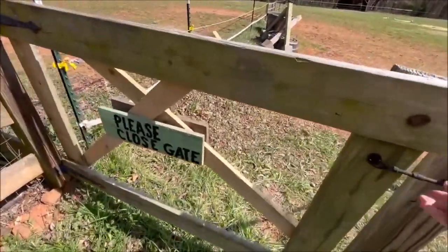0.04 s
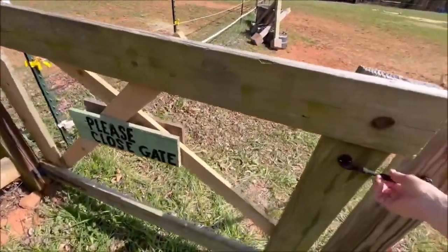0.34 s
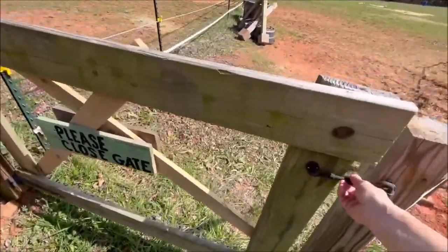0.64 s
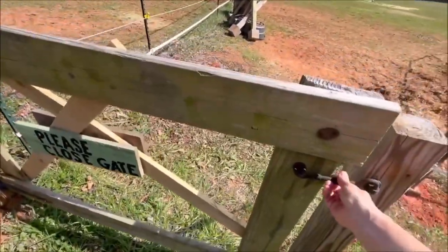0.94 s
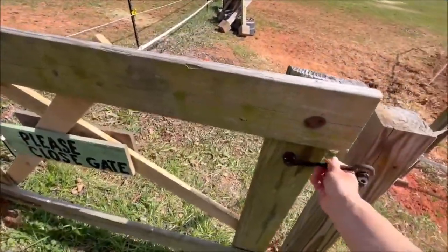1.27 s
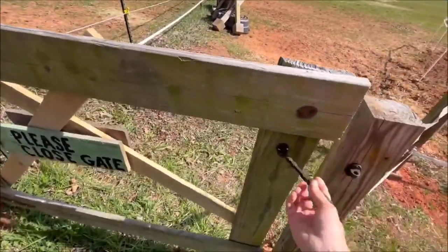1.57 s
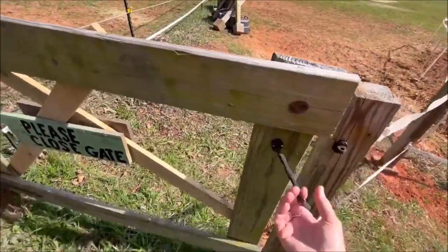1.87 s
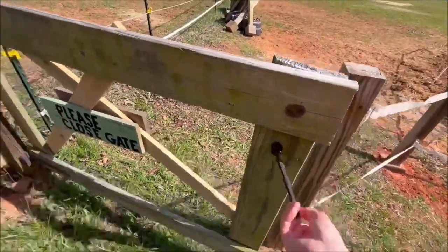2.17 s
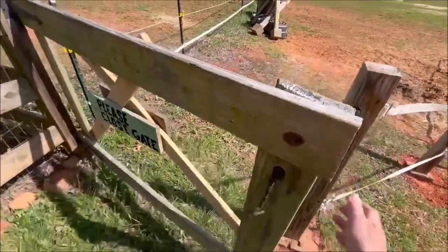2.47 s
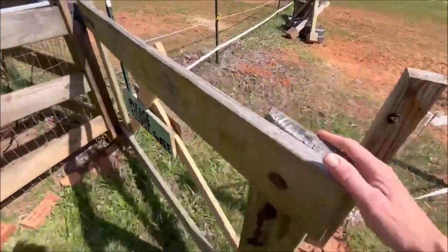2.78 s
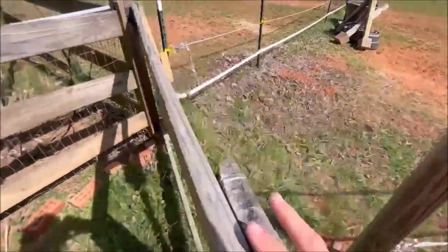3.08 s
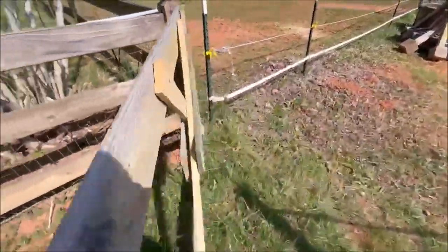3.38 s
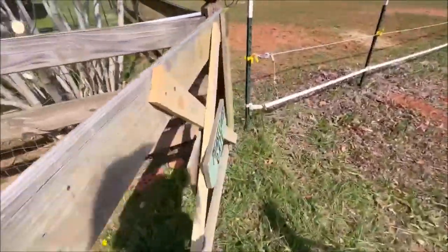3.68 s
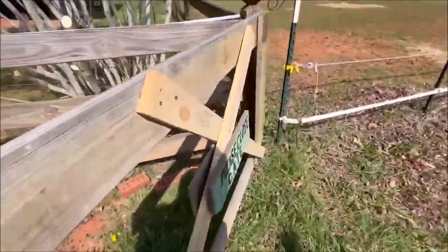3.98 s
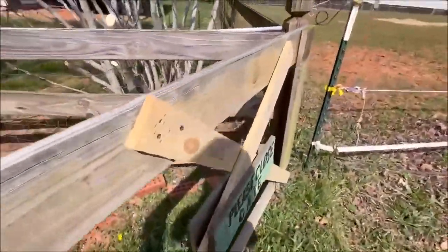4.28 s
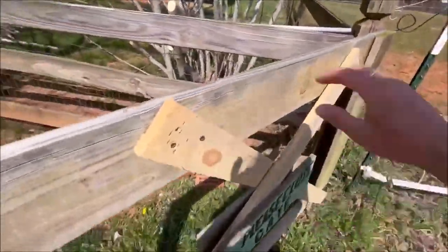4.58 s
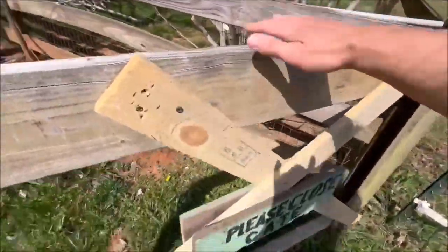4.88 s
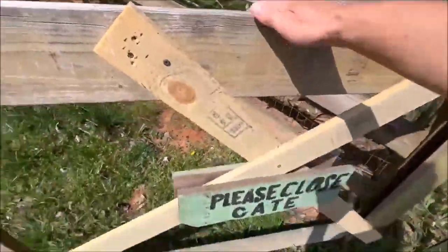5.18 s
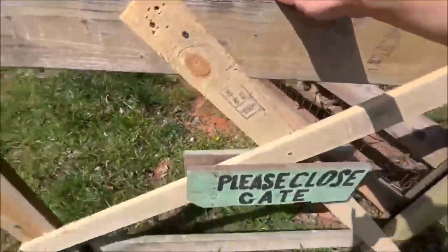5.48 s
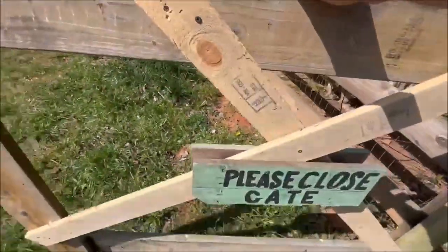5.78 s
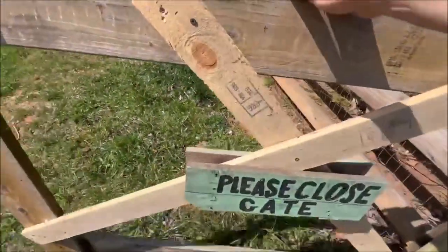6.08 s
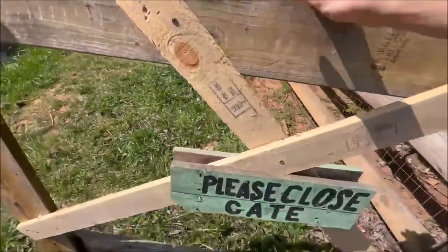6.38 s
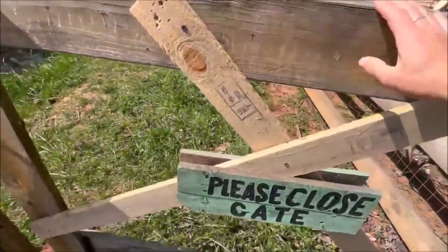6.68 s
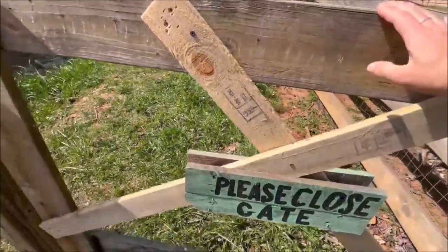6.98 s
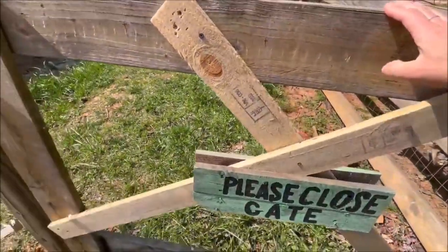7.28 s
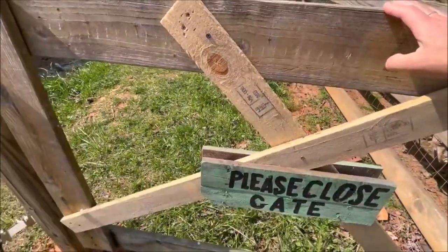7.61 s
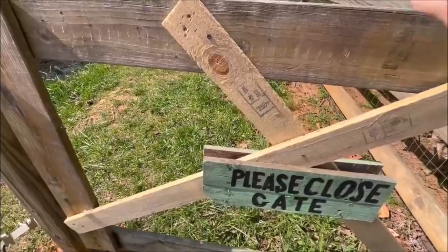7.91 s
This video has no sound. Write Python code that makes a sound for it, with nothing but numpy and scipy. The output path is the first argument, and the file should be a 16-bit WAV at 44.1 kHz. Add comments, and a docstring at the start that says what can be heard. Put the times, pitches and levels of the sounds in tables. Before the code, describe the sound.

A metal hook latch clicks, then clatters and rings against a wooden gate, followed by soft footsteps in grass and light bumps.

```python
"""Open air rumbles, a sleeve swishes and gusts buffet the two ports of a hand-held microphone.
A steel hook is worked out of its eye on a wooden farm gate, then dropped: it knocks, chatters and rings.
Each impact excites the damped modes of the boards; some also set the hook ringing. Steps rustle through
the grass by friction as the gate swings open and bumps softly against the fence, which resonates."""
import sys
import numpy as np
from scipy import signal
from scipy.fft import rfft, irfft, next_fast_len
from scipy.io import wavfile
from scipy.ndimage import uniform_filter1d

SR = 44100
rng = np.random.default_rng(int(sys.argv[2]) if len(sys.argv) > 2 else 0)


def generate_wav(sig):
    """Save sig (samples, or channels by samples) to the path in sys.argv[1] as 16-bit PCM at SR."""
    pcm = np.round(np.clip(np.atleast_2d(sig).T, -1, 1) * 32767).astype(np.int16)
    wavfile.write(sys.argv[1], SR, pcm)


N = 355005
TIME = np.arange(N) / SR
UNLATCHED_S, HOOK_FREE_S, AT_FENCE_S = 2.0, 2.3, 4.0


def undb(db):
    """Amplitude ratio of a level in decibels."""
    return 10 ** (np.asarray(db) / 20)


def unit(x):
    """Normalisation to rms 1."""
    return x / np.sqrt(np.mean(x ** 2) + 1e-20)


def curve(rows):
    """Amplitude envelope from (t/s, level/dB) rows."""
    return undb(np.interp(TIME, *np.transpose(rows)))


def along(points, hz):
    """Interpolation of (f/Hz, value) points over log frequency."""
    f, value = np.transpose(points)
    return np.interp(np.log(hz + 1), np.log(f), value)


def sides(pan_db):
    """Constant-power panning: gains for a left-minus-right level."""
    gains = undb(np.array([[.5], [-.5]]) * pan_db)
    return gains / np.sqrt(np.mean(gains ** 2, axis=0))


def colour(x, points):
    """Zero-phase filtering by (f/Hz, gain/dB) points."""
    size = next_fast_len(x.shape[-1])
    gain = undb(along(points, np.fft.rfftfreq(size, 1 / SR)))
    return irfft(rfft(x, size) * gain, size)[..., :x.shape[-1]]


def causal(db):
    """Minimum-phase response with these gains: it rings only after its cause."""
    cepstrum = irfft(db * np.log(10) / 20)
    half = len(cepstrum) // 2
    cepstrum[1:half] *= 2
    cepstrum[half + 1:] = 0
    return np.exp(rfft(cepstrum))


def ports(x, split_hz):
    """Spatial coherence: two independent signals become alike in the bass, staying apart in the treble."""
    size = next_fast_len(x.shape[-1])
    coherence = .92 / (1 + (np.fft.rfftfreq(size, 1 / SR) / split_hz) ** 2)
    mid, side = rfft(x, size) * np.sqrt([1 + coherence, 1 - coherence])
    return irfft(np.array([mid + side, mid - side]), size)[:, :x.shape[-1]] / np.sqrt(2)


def wander(rate_hz):
    """Smooth random modulation of rms 1."""
    step = int(SR / rate_hz)
    held = np.repeat(rng.standard_normal(N // step + 1), step)
    return unit(uniform_filter1d(held, step)[:N])


def fade(t, t60):
    """Exponential decay by 60 dB in t60, which is at least 1 ms."""
    return np.exp(-np.log(1000) * t / max(t60, 1e-3))


def swells(rows, rest_db, rise_share=.45):
    """Incoherent addition: rounded (t/s, length/s, level/dB) peaks sum in power over a floor."""
    t = TIME[::64]
    power = np.full(len(t), undb(rest_db) ** 2)
    for s, length, db in rows:
        away = (t - s) / (length * np.where(t < s, rise_share, 1 - rise_share))
        power += undb(db) ** 2 * np.exp(2 * (1 - np.hypot(1, away)))
    return np.sqrt(np.interp(TIME, t, power))


def add(out, s, x):
    """Superposition of x onto out at time s."""
    i = int(s * SR)
    out[:, i:i + x.shape[1]] += x[:, :N - i]


# Ambient spectrum: f/Hz, gain/dB
AIR_SPECTRUM = [(15, -49), (25, -14), (55, -0.5), (114, 0.5), (265, -14.5), (410, -15.5), (758, -23.5),
                (907, -20), (1810, -26.5), (2340, -25.5), (2530, -27.5), (4340, -38), (6540, -41.5),
                (11500, -79.5), (15000, -80), (22000, -120)]
# Ambient envelope: t/s, level/dB
AIR_ENVELOPE = [(0, -55.5), (2.5, -55), (3.15, -57), (4.4, -55), (6.3, -53.5), (8.05, -54.5)]


def air():
    """Diffuse field: distant rumble and the faint hiss of open country."""
    noise = ports(rng.standard_normal((2, N)), split_hz=450)
    return unit(colour(noise, AIR_SPECTRUM)) * curve(AIR_ENVELOPE) * undb(2.7 * wander(10))


# Distant whistles: start/s, end/s, f/Hz, level/dB
WHISTLE_TONES = [(.1, .98, 2550, -74), (.37, .48, 2557, -63), (.1, .66, 6440, -72), (2.08, 2.24, 6400, -73),
                 (2.05, 2.27, 1776, -69), (7.2, 8.0, 1787, -71)]


def whistles(waver=0.0045):
    """Random frequency and amplitude modulation: faint, unsteady tones from across the field."""
    out, drift, flutter = np.zeros((2, N)), wander(60), wander(25)
    for start, end, hz, db in WHISTLE_TONES:
        span = slice(int(start * SR), int(end * SR))
        phase = 2 * np.pi * np.cumsum(hz * (1 + waver * drift[span])) / SR
        tone = np.sin(phase + np.array([[0], [1]]))
        envelope = signal.windows.tukey(len(phase), .5) * undb(2 * flutter[span])
        add(out, start, unit(tone * envelope) * undb(db))
    return out


# Gusts on the ports: t/s, length/s, relative level/dB
GUST_SWELLS = [(.47, 0.057, -43), (.62, 0.063, -36.5), (.78, 0.081, -47), (1.42, 0.1, -36),
               (1.6, 0.14, -34), (1.7, 0.068, -34), (1.79, 0.06, -28), (1.97, 0.24, -48), (2.48, 0.2, -50)]


def wind():
    """Turbulent pressure: eddies push on the two ports mostly in opposition."""
    spectrum = [(20, -32.5), (45, -3), (70, -4), (110, -5.5), (180, -19.5), (350, -26),
                (900, -62.5), (4000, -90.5)]  # f/Hz, gain/dB
    eddies = unit(colour(rng.standard_normal((3, N)), spectrum))
    pressure = eddies[2] * np.array([[1], [-1]]) + 0.5 * eddies[:2]
    return pressure * swells(GUST_SWELLS, rest_db=-65.5) * undb(-2 + 2.3 * wander(28))


# Low buffets on the microphone: t/s, peak level/dB, f/Hz
BUFFET_PULSES = [(0.627, -31.5, 85.5), (1.401, -40, 61.6), (1.609, -42, 55), (1.69, -46, 62),
                 (1.756, -34.5, 66), (1.801, -38, 50), (1.971, -42, 53.4), (7.849, -38.5, 68)]


def buffets():
    """Gaussian wave packets: a couple of slow pressure swings, in phase at both ports."""
    out, t = np.zeros((2, N)), np.arange(-2000, 2000) / SR
    for s, db, hz in BUFFET_PULSES:
        pulse = np.exp(-(t * hz) ** 2) * np.cos(2 * np.pi * hz * t)
        add(out, s + t[0], undb(db) * pulse[None])
    return out


# Friction hiss: f/Hz, gain/dB
HISS_SPECTRUM = [(1500, -10), (2600, -10.5), (3900, -11.5), (4800, -4.5), (5500, -5), (6000, -7),
                 (7700, -11), (9500, -2), (11500, -6)]
# Direction of the hiss: f/Hz, left minus right/dB
HISS_BALANCE = [(1500, -6.5), (3500, 14.5), (5400, 20.5), (7500, 6.5), (10000, -1.5)]
# Top octave of the hiss: t/s, gain/dB
HISS_TREBLE = [(0, -12), (1, -4), (2.3, -5), (3.5, -7), (4.5, -5), (6.5, 2), (8.05, -7)]
# Duller brushing: f/Hz, gain/dB
BRUSH_SPECTRUM = [(150, -9), (300, 4.5), (600, -2.5), (1250, 0.5), (2000, 0), (3200, -4), (5000, -30)]
# A sleeve at the latch, then steps in grass: t/s, length/s, relative hiss/dB, relative brushing/dB
SWISH_SWELLS = [(-0.003, 0.12, -54.5, -64), (0.581, 0.11, -60.5, -49.5), (0.875, 0.11, -55.5, -58),
                (1.84, 0.8, -64, -60), (2.346, 0.18, -56.5, -52), (2.718, .2, -64, -60),
                (3.524, 0.26, -54.5, -52), (4.008, 0.28, -53.5, -54), (4.32, 0.062, -58.5, -46),
                (4.641, 0.097, -43.5, -56), (4.877, 0.24, -51, -51.5), (5.276, 0.35, -55.5, -55),
                (5.625, 0.089, -40.5, -46), (5.735, 0.13, -57.5, -63.5), (5.961, 0.076, -43, -48),
                (6.094, 0.12, -51, -48), (6.446, 0.45, -51.5, -54.5), (6.877, 0.11, -54, -62),
                (7.122, 0.33, -60, -62.5), (7.369, 0.096, -59.5, -58), (7.797, 0.031, -59.5, -60),
                (8.02, 0.087, -68, -77)]


def hiss_envelope():
    """Power sum of the swishes' hiss, shared by rustle and stalks."""
    return swells([row[:3] for row in SWISH_SWELLS], rest_db=-68.5)


def rustle(grain_db=2.5, crunch_db=0.8, flicker_db=1.85, treble_hz=6400):
    """Sliding friction: countless blades and fibres slip, a grainy hiss over a duller brushing."""
    slips = rng.standard_normal((2, N)) * undb(grain_db * np.minimum(rng.exponential(size=N), 6))
    slips *= undb(crunch_db * np.clip(wander(120), 0, 2.5) ** 2)  # a tuft gives way all at once
    hiss = np.array([colour(colour(x, HISS_SPECTRUM), [(f, sign * db / 2) for f, db in HISS_BALANCE])
                     for x, sign in zip(slips, (1, -1))])
    hiss = unit(hiss) * hiss_envelope() * undb(2 + 0.5 * wander(120))
    treble = signal.sosfiltfilt(signal.butter(4, treble_hz, "highpass", fs=SR, output="sos"), hiss)
    hiss += treble * (curve(HISS_TREBLE) - 1)
    rub = ports(rng.standard_normal((2, N)), split_hz=467) * undb(1.9 * wander(110))
    brush_envelope = swells([(s, length, db) for s, length, _, db in SWISH_SWELLS], rest_db=-62.5)
    brush = unit(colour(rub, BRUSH_SPECTRUM)) * brush_envelope * sides(8) * undb(-4)
    return (hiss + brush) * undb(flicker_db * wander(35))


def stalks(count=260, steps_s=(3.4, 7.4), cluster_s=.005, low_hz=2070, high_hz=10900):
    """Brittle fracture: dry stalks crack underfoot in clusters of ticks, louder under a heavier step."""
    out, t = np.zeros((2, N)), np.arange(256) / SR
    weight = hiss_envelope()
    for s in rng.uniform(*steps_s, size=count):
        strength, side = np.clip(rng.standard_normal(size=2), -2, 2)
        gain = weight[int(s * SR)] * undb(4 + 3.5 * strength) * sides(-1 - side)
        for lag, pitch in rng.random((4, 2)):
            hz = low_hz * (high_hz / low_hz) ** np.sqrt(pitch)
            add(out, s + cluster_s * lag, gain * np.sin(2 * np.pi * hz * t) * fade(t, 6.8 / hz))
    return out


# Modes of the gate and its bolts: f/Hz, nominal T60/s, level/dB when latched, swinging, at the fence
GATE_MODES = [(278, 0.22, -26.0, -21.0, -21), (345, 0.14, -18.0, -16.0, -33.0),
              (411, 0.16, -14.0, -24.0, -19.0), (566, 0.1, -10.0, -23.0, -20.0), (720, 0.13, -12, -22, -12),
              (817, 0.15, -11.0, -28.0, -13.0), (928, 0.1, -4, -9.0, -11.0), (972, 0.11, -2, -12, -8),
              (1056, 0.1, -21.0, -2.0, -24.0), (1084, 0.1, -21.0, -3.0, -15.0), (1205, 0.11, -5, -23, -5),
              (1256, 0.24, -30.0, -28.0, -8.0), (1341, 0.14, -8.0, -8.0, -28.0), (1395, 0.16, -2, -6, -18),
              (1465, 0.09, -2.0, 0.0, -13.0), (1560, 0.09, -4.0, -11.0, -10.0), (1670, 0.1, -4, -20, -23),
              (1808, 0.12, -6, -10, -9), (2010, 0.12, -22.0, -11.0, -38.0),
              (2093, 0.11, -20.0, -17.0, -10.0), (2214, 0.09, -9.0, -22.0, -36.0),
              (2290, 0.11, -24.0, -12.0, -29.0), (2795, 0.18, -38.0, -20.0, -24.0),
              (3155, 0.16, -17.0, -16.0, -31.0), (3367, 0.1, -7, -10, -22.0),
              (3560, 0.1, -24.0, -17.0, -39.0), (3880, 0.11, -17.0, -18.0, -16.0),
              (2925, .08, -20, -12, -30), (4285, .14, -20, -12, -35), (4667, .12, -18, -14, -35),
              (5500, .07, -14, -11, -35), (5860, .08, -15, -15, -35), (4850, 0.08, -14, -14, -30),
              (5155, 0.13, -18.0, -21.0, -37.0), (5300, 0.1, -16.0, -18.0, -15.0)]


def gate_modes(hz, contact_t60, hold):
    """Modal superposition: what holds the gate sets how strongly each of its resonances answers."""
    f, mode_t60, *mode_db = np.transpose(GATE_MODES)
    strength, phase, lag = rng.standard_normal((3, len(f)))
    port_phase = np.array([[0], [1]]) * lag * f / 1500  # higher modes arrive further out of step
    drive = undb(mode_db[hold] + 2.5 * strength) * np.exp(1j * (np.pi * phase + port_phase))
    # a short, firm contact also damps the modes, and the high ones radiate away fastest
    decay = np.log(1000) * (1.1 / mode_t60 + 0.15 / max(contact_t60, .01) + (f / 2600) ** 2)
    return irfft(drive @ (1 / (decay[:, None] + 2j * np.pi * (hz - f[:, None]))))


# Dense, short-lived modes of the boards: f/Hz, gain/dB
BOARD_SPECTRUM = [(120, -17), (300, -5), (560, -8), (950, 2), (1450, 5), (2100, -4.5), (2700, -11),
                  (3400, -8.5), (5300, -18), (7200, -18.5), (8800, -23), (10000, -31), (11500, -40.5)]
# Knock, thud, clank and tick registers: lower f/Hz, upper f/Hz
REGISTERS = [(700, 2500), (130, 700), (2500, 6500), (6500, 13000)]


def impact(s, build_s, t60, band_db, place, pan_db, size=12288):
    """Impulse response of the gate as held at time s: crack, dense and clear modes, yard scatter."""
    t, hz = np.arange(size) / SR, np.fft.rfftfreq(size, 1 / SR)
    hold = np.searchsorted([UNLATCHED_S, AT_FENCE_S], s)
    onset = np.minimum(t / (build_s + 0.002), 1) ** 2  # a blow takes time to spread through the boards
    after = np.maximum(t - build_s, 0)
    grain = ports(rng.standard_normal((2, size)), split_hz=1400) * onset
    dense = unit(grain * fade(after, t60))
    crack = unit(grain * fade(after, t60 * 0.197))
    yard = unit(rng.standard_normal((2, size)) * (1 - fade(t, .08)) * fade(t, .3))
    burst = dense + undb(-10.5) * crack + undb(-18) * yard
    body = unit(irfft(rfft(burst) * causal(along(BOARD_SPECTRUM, hz))))
    modes = undb([-1.5, 1, 5][hold]) * unit(gate_modes(hz, t60, hold) * onset)
    # the place of contact favours one resonance of the wood and one of the steel
    wood_hz, wood_db, steel_hz, steel_db = place
    place_db = wood_db / (1 + ((hz - wood_hz) / 110) ** 2) + steel_db / (1 + ((hz - steel_hz) / 330) ** 2)
    taper = np.minimum(2 * (1 - t / t[-1]), 1) ** 2
    sound = irfft(rfft(body + modes) * causal(place_db)) * taper
    pan_scales, loss_db_per_s = [1.8, 0.062, 1.7, 0.63], [1, -9, 82.5, 300.5]  # wood absorbs the treble
    out = 0
    for edges, db, pan_scale, loss in zip(REGISTERS, band_db, pan_scales, loss_db_per_s):
        band = signal.sosfilt(signal.butter(3, edges, "bandpass", fs=SR, output="sos"), sound)
        out += unit(band * undb(-loss * after)) * undb(db) * sides(pan_db * pan_scale)
    return out * np.sqrt(.02 * SR / size)  # levels count the energy as spread over 20 ms


# Dry snaps among the rustling: t/s, relative level/dB, favoured f/Hz
DRY_SNAPS = [(4.232, -46.5, 6500), (4.37, -57, 2950), (4.618, -47, 5300), (6.007, -37, 2900),
             (6.112, -42.5, 1700), (6.138, -45, 2700), (7.245, -51, 9000), (7.271, -47, 6500)]


def snaps():
    """Brief excitation has a broad spectrum: very short, bright ticks."""
    out = np.zeros((2, N))
    for s, db, hz in DRY_SNAPS:
        band_db = db + np.array([-20.5, -18, -14, -12])
        place = (1500, 0, hz, 19)
        add(out, s, impact(s, build_s=0.00057, t60=0.0054, band_db=band_db, place=place, pan_db=12))
    return out


# The hook rubs in its eye, the gate nudges the fence: t/s, build/s, level/dB, favoured wood f/Hz
SOFT_CONTACTS = [(0.192, 0.012, -57, 1420), (0.417, 0.0056, -48.5, 1510), (0.553, 0.017, -44, 1460),
                 (0.564, 0.0042, -39.5, 1390), (0.588, 0.0024, -44, 1380), (1.138, 0.013, -34, 1630),
                 (1.179, 0.0053, -37, 720), (1.461, 0.011, -41, 1070), (1.491, 0.015, -43, 1070),
                 (2.243, 0.0039, -46, 1400), (2.369, 0.0053, -35.5, 880), (4.309, 0.0026, -43.5, 1020),
                 (4.345, 0.0055, -58, 1400), (4.79, 0.0012, -50, 880), (4.89, 0.0062, -45.5, 1140),
                 (5.555, 0.0012, -32.5, 1190), (5.561, 0.00205, -43.5, 950), (5.636, 0.016, -40, 1610),
                 (5.653, 0.011, -41.5, 1230), (6.26, 0.014, -45, 1220), (6.845, 0.016, -50.5, 1220),
                 (6.973, 0.004, -49, 850), (7.354, 0.0085, -43, 1210), (7.415, 0.0094, -53, 750),
                 (7.941, 0.0068, -42, 1010)]


def bumps(wood_lift_db=7.5, steel_hz=4670, steel_lift_db=6.5):
    """Soft contact excites little treble; a slower push also dies away more slowly."""
    out = np.zeros((2, N))
    for s, build_s, db, wood_hz in SOFT_CONTACTS:
        band_db = db + np.array([0, -6, -15.5, -49.5])
        t60 = 0.12 + 5.5 * build_s
        place = (wood_hz, wood_lift_db, steel_hz, steel_lift_db)
        add(out, s - build_s, impact(s, build_s, t60, band_db, place, pan_db=4))
    return out


# Modes of the fence: f/Hz, relative level/dB, T60/s
FENCE_RESONANCES = [(725, -5, .12), (817, -3, .12), (948, -2, .1), (1074, -3, .1), (1210, -4, .09),
                    (1256, 0, .22), (1442, 2, .09), (1580, 2, .11), (1657, -2, .1), (1805, -2, .08),
                    (2093, 0, .1)]


def fence(width=0.087, other_modes_db=-12):
    """Coupled vibration: each bump against the fence rings its modes, most near the favoured note."""
    out, t = np.zeros((2, N)), np.arange(SR // 2) / SR
    for s, build_s, db, favoured_hz in SOFT_CONTACTS:
        if s > AT_FENCE_S:
            note = 0
            for f, mode_db, t60 in FENCE_RESONANCES:
                coupling = undb(other_modes_db) + 1 / (1 + (np.log(f / favoured_hz) / width) ** 2)
                phase = 2 * np.pi * (f * t + rng.random()) + np.array([[0], [2]])
                note += coupling * undb(mode_db) * fade(t, t60) * np.sin(phase)
            gain = undb(db - 3 + 450 * build_s)  # a slower push moves the fence more
            add(out, s, gain * note * (1 - fade(t, 0.0098 + build_s)))
    return out


# Boom of the timber frame: f/Hz, gain/dB
FRAME_SPECTRUM = [(60, -27), (140, -5), (300, 2.5), (500, -4.5), (900, -12), (2500, -32), (8000, -61)]


def frame(share_db=-25.5, build_s=.03, t60=0.48):
    """Structural reverberation: the heavy frame stores a little of each knock and returns a low boom."""
    power, t = np.zeros((1, N)), np.arange(SR) / SR
    for s, _, db, *_ in HARD_CONTACTS:
        envelope = undb(db + share_db) * (1 - fade(t, build_s)) * fade(t, t60)
        add(power, s, envelope[None] ** 2)
    noise = ports(rng.standard_normal((2, N)), split_hz=900)
    return unit(colour(noise, FRAME_SPECTRUM)) * np.sqrt(power)


# Bending modes of the hook: f/Hz, relative level/dB, free T60/s
HOOK_MODES = [(1435, 0, .12), (1510, -3, .06), (2309, -3, .2), (2458, 0, .22), (2799, -6, .3),
              (3316, -3, .25), (3564, -3, .14), (4270, -8, .2), (4667, -5, .16), (4880, -5, .2),
              (5155, -4, .25), (5305, -5, .22), (5480, -6, .15), (5830, -7, .12), (6212, -4, .1),
              (6628, 0, .28), (7590, -10, .25), (8150, -9, .25), (8166, -3, .44), (8620, -8, .2),
              (8982, -6, .25), (10645, 0, .4), (10790, -7, .3)]
# Rings of the hook: t/s, relative level/dB, favoured f/Hz, decay rate factor (1 = free)
HOOK_RINGS = [(1.147, -38, 5200, 6.6), (1.253, -40.5, 10650, 3.8), (2.422, -20.5, 2542, 0.55),
              (2.456, -24.5, 6770, 0.97), (2.476, -23, 5540, 2.5), (2.476, -21, 8740, 5.2),
              (2.454, -17, 8800, 6), (2.487, -22, 6630, 1.7), (2.422, -37, 10650, 1.5),
              (2.488, -42, 10870, 0.93), (2.49, -38.5, 8170, 0.5), (2.522, -35, 4740, 3.3),
              (2.456, -25.5, 2310, 0.78), (2.473, -26, 3420, 0.91), (2.473, -23, 6100, 1.2),
              (2.488, -30, 4550, 1.3), (2.802, -25.5, 1450, 1.2), (2.801, -44.5, 8070, 0.67),
              (2.802, -12.5, 5370, 7.8), (2.804, -30.5, 6630, 2.9), (2.816, -53, 10650, 1.65)]


def hook(width=0.038, other_modes_db=-31.5, last_bounce_s=2.521, check_db=-11):
    """Flexural vibration: the steel rod rings with thin, clear modes, most where the contact favours."""
    out, t = np.zeros((2, N)), np.arange(SR // 2) / SR
    for s, db, favoured_hz, damping in HOOK_RINGS:
        ring = 0
        for f, mode_db, t60 in HOOK_MODES:
            coupling = undb(other_modes_db) + 1 / (1 + (np.log(f / favoured_hz) / width) ** 2)
            phase = rng.uniform(0, 2 * np.pi) + np.array([[0], [np.pi / 2]])
            ring += coupling * undb(mode_db) * fade(t * damping, t60) * np.sin(2 * np.pi * f * t + phase)
        if s < last_bounce_s - .01:  # the chatter's last bounce checks whatever still rings
            ring *= undb(check_db * np.clip((s + t - last_bounce_s) / .004, 0, 1))
        add(out, s, undb(db) * ring * (1 - fade(t, 0.011)) * sides(4.1))
    return out


# Knocks: t/s, burst T60/s, level/dB, thud/dB and clank/dB re that level,
# favoured wood f/Hz, its lift/dB, favoured steel f/Hz, its lift/dB, nominal pan/dB
HARD_CONTACTS = [(0.659, 0.046, -31, -10, -11.5, 1645, 11.6, 5100, 10, 3.6),
                 (1.032, 0.064, -24, -15, -12.5, 950, 6.6, 3380, 8.4, 2.8),
                 (1.0671, 0.018, -17.5, -23, -6, 1450, 5.3, 3400, 4.6, 4),
                 (1.073, 0.051, -25.5, -7.5, -8.5, 1620, 4, 3220, 4.6, 3.3),
                 (1.146, 0.0054, -21.5, -38, -6.5, 1480, 5, 5230, 12, 5.1),
                 (1.154, 0.075, -26.5, -10.5, -20, 1850, 2.9, 3500, 3, 1.1),
                 (1.174, 0.03, -40, 5, -6, 715, 8.5, 3280, 7, 4),
                 (1.254, 0.043, -22, -11.5, -5, 953, 10, 7000, 4.9, 6.4),
                 (1.264, 0.11, -28.5, -5.5, -10, 930, 6.5, 3870, 6, 2.2),
                 (2.4191, 0.011, -10, -7.5, -17, 1390, 7.9, 2320, 6.1, 3.3),
                 (2.435, 0.15, -27.5, -13.5, -5, 1080, 7, 3930, 7, 1.7),
                 (2.454, 0.06, -21, -13, -11, 1400, 5, 8900, 11, 2.6),
                 (2.472, 0.17, -23, -12.5, -1, 880, 10, 5250, 7.2, 4.3),
                 (2.486, 0.11, -25.5, -17, -6.5, 1500, 3.6, 3150, 15, 4.3),
                 (2.502, 0.12, -24, -19, -10, 1410, 5.2, 6300, 7.9, 2.3),
                 (2.523, 0.08, -29.5, -14.5, -3, 1380, 3.2, 4950, 5.1, 4.2),
                 (2.7591, 0.091, -34, -7, -16.5, 1750, 7.9, 6500, 7, 5.9),
                 (2.8015, 0.082, -27, -37, -2, 1437, 16.4, 4850, 21, 2.3),
                 (2.815, 0.1, -29, -15.5, -12.5, 1495, 9.9, 4120, 15, 6),
                 (5.633, 0.08, -35, -25.5, -1, 1500, 14, 4230, 7.7, 1.2)]


def knocks(build_s=0.00067):
    """Impulsive excitation: the hook strikes its eye, then the boards; last the gate meets the fence."""
    out = np.zeros((2, N))
    for s, t60, db, thud_db, clank_db, *place, pan_db in HARD_CONTACTS:
        tick_db = -15 if s > HOOK_FREE_S else -16  # hanging free, or held in the fingers
        band_db = db + np.array([0, thud_db, clank_db, clank_db + tick_db])
        add(out, s - build_s, impact(s, build_s, t60, band_db, place, pan_db))
    return out


def scene():
    """Linear superposition of all sources at the microphone."""
    gate = knocks() + bumps() + frame() + hook() + fence()
    grass = snaps() + stalks() + rustle()
    return gate + grass + wind() + buffets() + whistles() + air()


def record(dry, cutoff_hz=11750):
    """Soft saturation rounds the loudest peaks; a low-pass filter cuts the top."""
    return signal.sosfilt(signal.ellip(10, .2, 80, cutoff_hz, fs=SR, output="sos"), np.tanh(dry))


dry = scene()
out = record(dry)
generate_wav(out)
```